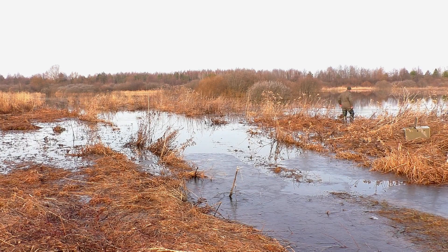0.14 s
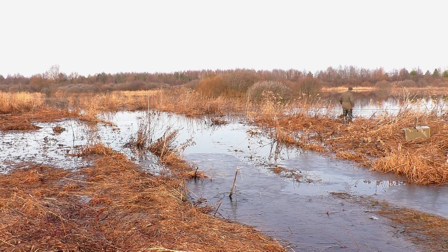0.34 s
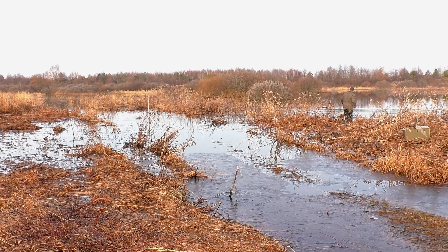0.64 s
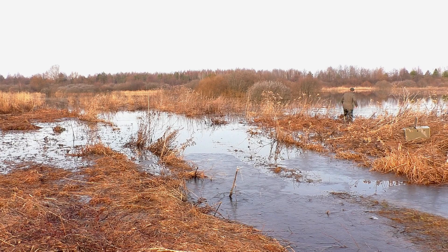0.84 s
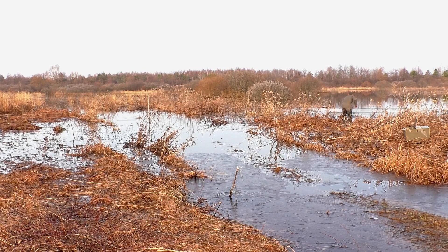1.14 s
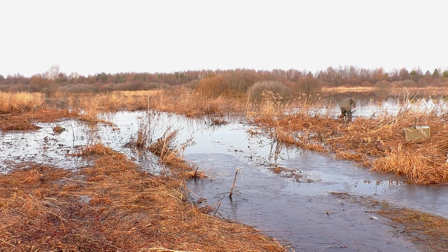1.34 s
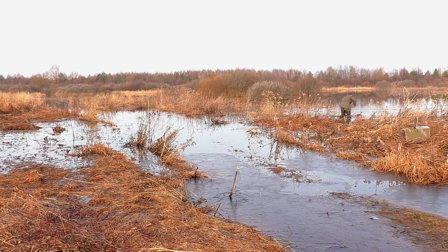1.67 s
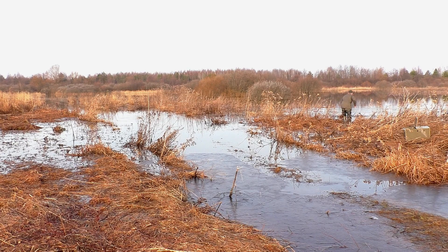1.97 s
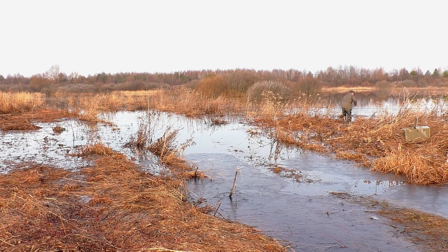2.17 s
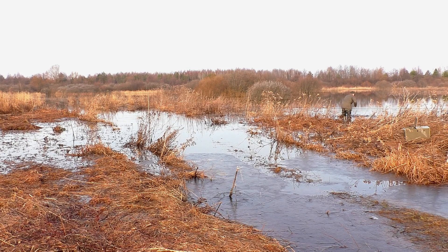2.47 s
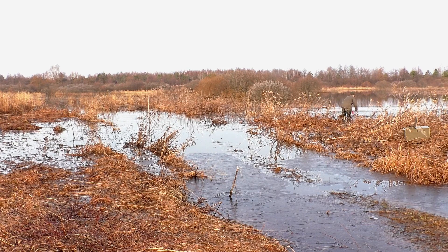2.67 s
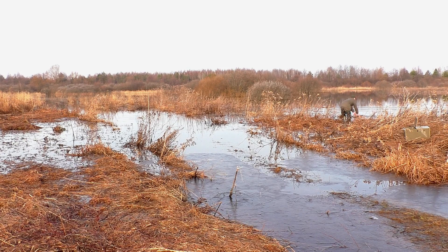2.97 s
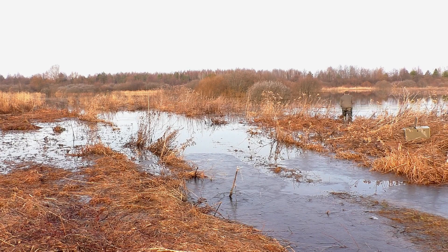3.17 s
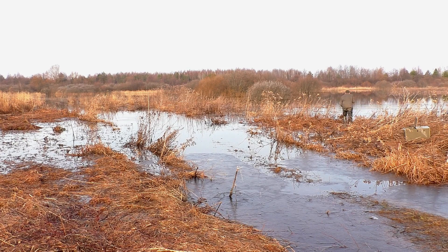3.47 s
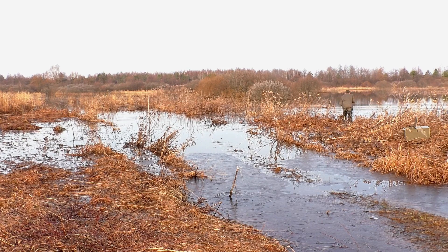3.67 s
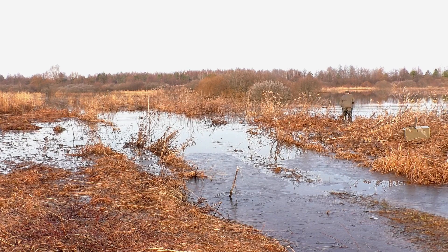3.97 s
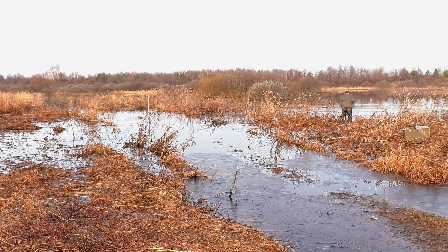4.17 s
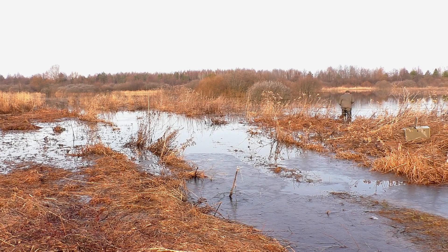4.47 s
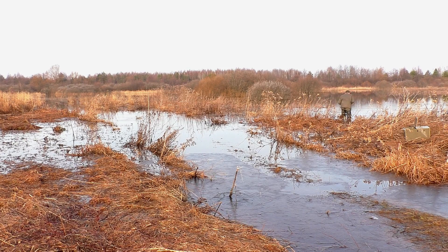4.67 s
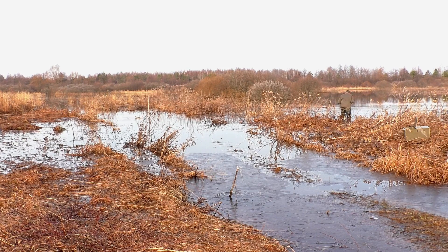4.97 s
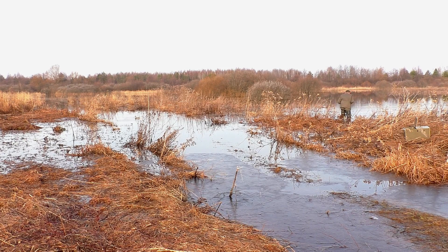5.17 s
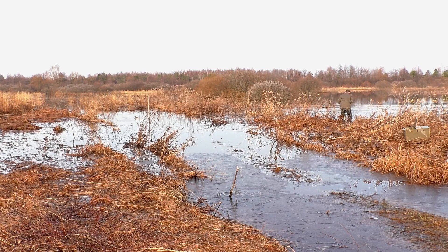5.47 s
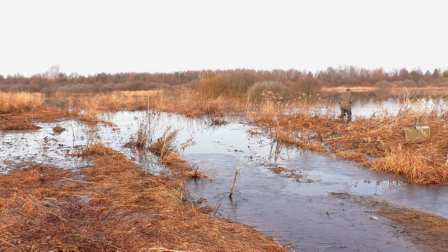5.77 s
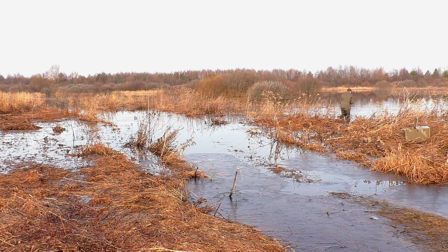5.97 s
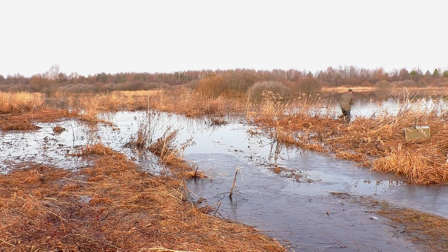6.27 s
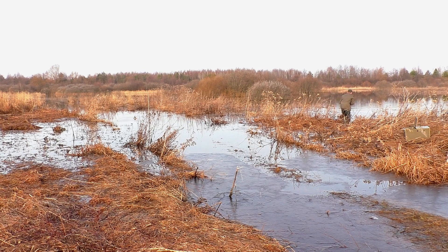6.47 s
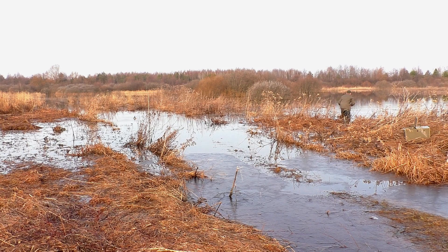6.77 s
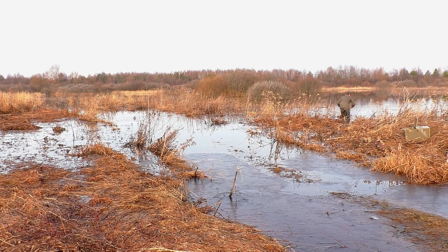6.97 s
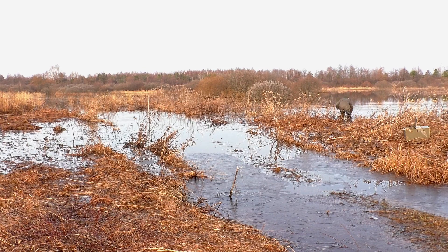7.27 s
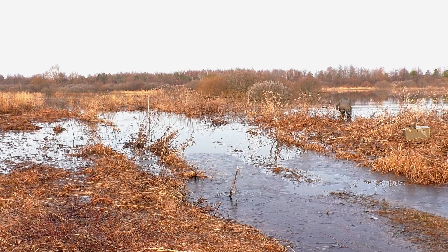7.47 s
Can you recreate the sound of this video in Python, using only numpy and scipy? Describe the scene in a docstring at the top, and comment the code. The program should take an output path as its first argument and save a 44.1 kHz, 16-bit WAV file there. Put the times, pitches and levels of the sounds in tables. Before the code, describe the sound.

Someone wades through wet grass, water plopping and stems cracking, while a duck quacks roughly every seven tenths of a second. The first five quacks are near, buzzy and forceful; the remaining six drop sharply in level and echo more. A quick run of tiny clucks comes near five seconds. Small birds twitter faintly later, with distant low hoots. Quiet open marsh, heard in wide stereo over faint rumble and hiss.

```python
"""The air rumbles faintly while someone wades through wet grass on a flooded marsh; something hoots far off.
A hen duck quacks eleven times: five hard, rasping calls, then, turned away, six softer, clearer ones.
Each quack is a train of uneven syrinx slaps and hissing puffs through the resonances of windpipe and bill.
Steps are noise grains, gliding bubbles and snaps; hoots and small birds' whistles are gliding sines.
The reeds and the distant trees, a decaying coloured noise, give quacks, steps and song a short, dull echo."""
import sys
import numpy as np
from scipy import signal
from scipy.fft import rfft, irfft, next_fast_len
from scipy.io import wavfile
from scipy.ndimage import map_coordinates

SR = 44100
rng = np.random.default_rng(int(sys.argv[2]) if len(sys.argv) > 2 else 0)


def int16_out(signal):
    """Quantize to a 16-bit WAV file."""
    q = np.round(np.clip(np.atleast_2d(signal).T, -1, 1) * 32767)
    wavfile.write(sys.argv[1], SR, q.astype(np.int16))


N = 335601  # length [samples]


def amp(db):
    """Decibels to gain."""
    return 10 ** (np.asarray(db) / 20)


def unit(x):
    """Scaled to rms 1."""
    return x / np.sqrt(np.mean(x ** 2) + 1e-20)


def along(points, hz):
    """(frequency [Hz], value) points read on a log frequency axis."""
    f, v = np.transpose(points)
    return np.interp(np.log(hz + 1), np.log(f + 1), v)


def span(start, length):
    """Sample times of one event."""
    return start + np.arange(round(length * SR)) / SR


def fade(t, rise, fall):
    """A gate with straight ramps at both ends."""
    return np.clip((t - t[0]) / rise, 0, 1) * np.clip((t[-1] - t) / fall, 0, 1)


def add(track, s, x):
    """Mix x into the track at s seconds."""
    i = max(round(s * SR), 0)
    track[i:i + len(x)] += x[:max(len(track) - i, 0)]


def wobble(t, rate):
    """A smooth random curve, rate knots a second."""
    u = (t - t[0]) * rate
    return map_coordinates(rng.standard_normal(int(u[-1]) + 4), [u])


def filtered(x, response):
    """x times a response of frequency."""
    n = x.shape[-1]
    m = next_fast_len(n + 8192)
    return irfft(rfft(x, m) * response(np.fft.rfftfreq(m, 1 / SR)), m)[..., :n]


def resonate(x, points, size=2048):
    """x through a causal body with the given spectrum."""
    # folding the cepstrum gives the minimum-phase response
    cepstrum = irfft(np.log(amp(along(points, np.fft.rfftfreq(size, 1 / SR)))))
    cepstrum[1:size // 2] *= 2
    cepstrum[size // 2 + 1:] = 0
    body = irfft(np.exp(rfft(cepstrum)))
    return signal.fftconvolve(x, body)[:len(x)]


def pulses(at, sizes, length):
    """Clicks at fractional sample positions, each a windowed sinc."""
    taps = np.floor(at)[:, None].astype(int) + np.arange(-7, 9)
    d = taps - at[:, None]
    shape = np.sinc(d) * np.cos(np.pi * d / 16) ** 2
    return np.bincount(np.clip(taps, 0, length - 1).ravel(), (sizes[:, None] * shape).ravel(), length)


def steady(x, size=1201):
    """x with its slow loudness evened out to rms 1."""
    window = np.hanning(size)
    energy = signal.fftconvolve(x ** 2, window, 'same')
    power = energy / signal.fftconvolve(np.ones(len(x)), window, 'same')
    return x / np.sqrt(np.abs(power) + 1e-20)


def band(x, lo_hz, hi_hz, order=40):
    """The part of x between two edges, steeper with a higher order."""
    return filtered(x, lambda hz: 1 / (1 + (hz / hi_hz) ** order) - 1 / (1 + (hz / lo_hz) ** order))


def pan(x, side_db):
    """Mono to stereo, side_db louder on the left."""
    return x * amp(np.array([[side_db], [-side_db]]) / 2)


def blip(hz, glide, life):
    """A short gliding ring with a soft start, its envelope peaking at 1."""
    u = np.arange(SR // 10) / SR / life
    phase = np.cumsum(hz * (1 + glide * (1 - np.exp(-u / 2)))) / SR
    return u * np.exp(1 - u) * np.sin(2 * np.pi * phase)


# how alike left and right are in the open air: (frequency [Hz], correlation [-1 to 1])
LIKENESS = [(60, 0.84), (150, 0.88), (380, 0.77), (950, 0.66), (2380, 0.16), (5980, 0.66), (15000, 0.56)]


def rush(spectrum):
    """Stereo noise of rms 1; the mid-side balance sets how alike the two sides are."""
    def turn(hz):
        """Angle between mid and side [rad]."""
        return np.arccos(np.clip(along(LIKENESS, hz), -1, 1)) / 2

    def response(hz):
        """Gains of mid and side."""
        return amp(along(spectrum, hz)) * [np.cos(turn(hz)), np.sin(turn(hz))]

    mid, side = filtered(rng.standard_normal((2, N)), response)
    return unit(np.array([mid + side, mid - side]))


# colour of the low rumble: (frequency [Hz], relative level [dB])
RUMBLE_COLOUR = [(12, -59), (20, -41), (39, -6), (70, -0.5), (170, -2), (215, -3.5), (260, -9),
                 (333, -11.5), (392, -11), (428, -16), (483, -10), (594, -28.5), (700, -23), (910, -56),
                 (1540, -120)]
# colour of the faint hiss: (frequency [Hz], relative level [dB])
AIR_COLOUR = [(350, -62), (600, -9), (688, -2.5), (789, -13.5), (880, 0), (1360, 0.5), (1890, 3.5),
              (4080, -11.5), (4870, -14.5), (5980, -20), (9520, -15.5), (10500, -12), (15800, -14)]
RUMBLE_DB, AIR_DB = -54.5, -61  # mean levels


def open_air():
    """A low, wavering rumble under a faint even hiss, both coloured noise."""
    t = np.arange(N) / SR
    rumble = amp(RUMBLE_DB + 0.73 * wobble(t, 9)) * rush(RUMBLE_COLOUR)
    return rumble + amp(AIR_DB + 0.13 * wobble(t, 3.33)) * rush(AIR_COLOUR)


# a boot stirs the water, both levels at the loudest moment, before the clumping:
# (loudest time [s], swell time constant [s], ebb time constant [s], slosh level [dB], grass crackle level [dB])
STRIDES = [(0.099, 0.23, 0.083, -54, -68), (1.52, 0.54, 0.16, -54.5, -69), (1.7, 0.11, 0.11, -43, -52),
           (2.02, 0.1, 0.2, -47, -60.5), (2.23, 0.24, 0.21, -47.5, -63.5),
           (3.17, 0.23, 0.037, -51.5, -66.5), (3.862, 0.013, 0.023, -56, -89)]
LAPPING_DB = -79.5  # water between the strides, before the clumping


def stirring(t):
    """Strength of slosh and of crackle: each stride swells and ebbs."""
    slosh, crackle = np.full(N, amp(LAPPING_DB)), np.zeros(N)
    for s, swell, ebb, slosh_db, crackle_db in STRIDES:
        push = np.exp(-np.maximum((s - t) / swell, (t - s) / ebb))
        slosh = np.maximum(slosh, amp(slosh_db) * push)
        crackle = np.maximum(crackle, amp(crackle_db) * push)
    return slosh, crackle


def grains(rate, spread_db):
    """Random tiny impacts of uneven size, rms 1."""
    hit = rng.random(N) < rate / SR
    return unit(hit * rng.choice([-1, 1], N) * amp(spread_db * np.clip(rng.standard_normal(N), -2, 2)))


def bubbles(rate, hz, spread):
    """Small bubbles of random pitch and size, each a ring gliding up; rms 1."""
    track = np.zeros(N)
    count = int(rate * N / SR)
    times = rng.random(count) * N / SR
    for s, (pitch, size) in zip(times, rng.standard_normal((count, 2)).clip(-2, 2)):
        add(track, s, amp(3.6 * size) * blip(hz * np.exp(spread * pitch), glide=0.16, life=0.0021))
    return unit(track)


# colour of the stirred water: (frequency [Hz], relative level [dB])
SLOSH_COLOUR = [(240, -3), (400, -3.5), (826, -19.5), (946, -3), (1170, -6), (1710, -13), (3250, -8),
                (6000, -23), (7800, -31), (13200, -120)]
# colour of crushed wet stems: (frequency [Hz], relative level [dB])
CRACKLE_COLOUR = [(2500, -39), (4500, 13.5), (9000, 21), (15000, 13)]
# water gulping round the boots: (time [s], level before the 2 dB plop trim and pan [dB], starting pitch [Hz])
PLOPS = [(0.067, -40, 1210), (0.094, -44, 1030), (1.259, -39.5, 2090), (1.306, -36, 1320),
         (1.329, -42.5, 2310), (2.029, -37, 1090), (2.116, -37, 1150), (2.186, -43, 1230),
         (3.129, -51, 1810), (3.161, -43, 1070), (3.178, -44, 2230), (3.852, -44, 1280),
         (3.869, -42.5, 1820), (3.885, -53, 2110)]
# low knocks, boots thudding into mud and the low part of stem snaps:
# (time [s], envelope peak before pan [dB], starting pitch [Hz])
KNOCKS = [(1.672, -33.5, 270), (1.69, -39, 198), (2.028, -54, 630), (2.187, -40.5, 840)]
# stems snapping underfoot: (time [s], peak level before pan [dB])
SNAPS = [(0.04, -41.5), (0.766, -47.5), (1.3293, -29), (1.447, -42), (1.542, -34.5), (1.6234, -37),
         (1.651, -22), (1.7857, -23), (2.028, -38), (2.054, -33.5), (3.1807, -48), (6.4697, -55)]
PLOP_TRIM_DB = -2


def wading():
    """Boots stir the water, trap bubbles and crush wet stems: grains, rings and noise bursts."""
    t = np.arange(N) / SR
    slosh, crackle = stirring(t)
    clumps = amp(4.1 * wobble(t, 45))
    splash = unit(resonate(grains(3000, spread_db=4), SLOSH_COLOUR))
    water = unit(splash + .7 * bubbles(rate=200, hz=1300, spread=.3))
    stems = unit(resonate(grains(2200, spread_db=6), CRACKLE_COLOUR))
    track = slosh * clumps * water + crackle * clumps * stems
    for s, db, hz in PLOPS:
        add(track, s, amp(db + PLOP_TRIM_DB) * blip(hz, glide=.12, life=.0016))
    for s, db, hz in KNOCKS:
        add(track, s, amp(db) * blip(hz, glide=-0.025, life=0.0013))
    age = np.arange(SR // 30) / SR
    # a quick crack and a fainter, longer tail
    decay = amp(-60 * age / .005) + .1 * amp(-60 * age / .025)
    for s, db in SNAPS:
        snap = resonate(rng.standard_normal(len(age)) * decay, CRACKLE_COLOUR)
        add(track, s, amp(db) * snap / np.abs(snap).max())
    return track


# far hoots: (time [s], length [s], mean pitch [Hz], peak level before pan [dB])
HOOTS = [(0.08, .14, 470, -49.5), (0.68, 0.19, 474, -53.5), (2.55, 0.12, 487, -52.5),
         (3.14, 0.13, 474, -53.5), (4.69, .16, 484, -59), (6.24, 0.22, 488, -57.5),
         (6.87, 0.23, 464, -60.5)]


def hoots():
    """Far calls: single sines that sag in pitch, with soft ends."""
    track = np.zeros(N)
    for s, length, hz, db in HOOTS:
        t = np.arange(int(length * SR)) / SR
        phase = np.cumsum(hz * (1 - 0.1 * (t / length - .5) + 0.0015 * wobble(t, 28))) / SR
        add(track, s, amp(db) * np.sin(2 * np.pi * phase) * fade(t, 0.036, 0.077))
    return track


# the voice cracks, the pitch jumps and the beats even out:
# (middle time [s], length [s], pitch jump [share of pitch], evenness [0-1], level change [dB])
CRACKS = [(1.677, .118, .036, 0.07, 0.5), (1.71, .064, .045, 0.95, -4), (2.888, .022, -.11, 0.3, -2.5),
          (2.919, .038, 0.091, .5, 1.5), (3.015, 0.0322, 0.033, 0.2, 0), (3.054, .044, .1, 0.2, 1.5)]
CRACK_EDGE = 4.2  # how squarely a crack sets in and lets go


def cracks(t):
    """Pitch jump, evenness and level change where the voice cracks."""
    return sum(np.outer(change, np.exp(-np.abs(2 * (t - s) / length) ** CRACK_EDGE))
               for s, length, *change in CRACKS)


def grass(x, level_db, t60):
    """Stems close by scatter the sound, smearing and colouring it a little."""
    age = np.arange(SR // 20) / SR
    tail = rng.standard_normal(len(age)) * amp(-60 * age / t60)
    response = (age == 0) + amp(level_db) * tail / np.linalg.norm(tail)
    return signal.fftconvolve(x, response / np.linalg.norm(response))


# windpipe and bill, heard from the front: (frequency [Hz], relative level [dB])
THROAT_FRONT = [(180, -25), (700, -24.5), (950, -17.5), (1230, -7), (1430, -11.5), (1750, 6), (1960, 3.5),
                (2150, 5.5), (2580, -21), (3100, -14.5), (3500, -27.5), (4150, -27.5), (4750, -27.5),
                (6500, -27), (10000, -37.5), (16000, -58)]
# windpipe and bill, heard from behind: (frequency [Hz], relative level [dB])
THROAT_BEHIND = [(180, -29), (700, -4), (950, 7), (1250, 7.5), (1480, -7.5), (1730, -8.5), (2020, 3),
                 (2350, -10), (2700, -8), (3020, -21), (3300, -13), (3850, -25.5), (4700, -27), (7000, -34),
                 (16000, -43)]
# change of each band while the bill is still shut [dB]
SHUT_MAIN_DB, SHUT_THROAT_DB, SHUT_EDGE_DB, SHUT_FUNDAMENTAL_DB = -20, -5, -15, -9
BODY_AIR, EDGE_AIR = .25, 1  # share of hissing air in the resonances and in the bright edge
SHUT_SCALE, RESONANCE_RISE_S = 0.826, 0.015  # resonances behind a shut bill, and how fast they rise
OPENING_CURVE = 1.4  # the bill starts to open slowly, then quickly
ATTACK_DB, ATTACK_S = -7, 0.0097  # the first few slaps are weak
EDGE_PUSH, FUNDAMENTAL_PUSH = 1.6, 0.27  # their dB per dB of growing push
WANDER, WANDER_PER_S = 0.00612, 28.07  # the held pitch is never quite still: share of pitch, knots/s
JITTER, EARLY = 0.033, 0.11  # scatter at full roughness, lead of a fully weak slap [cycles]
SIZZLE_DB, SLACK_DB = 1, -5.5  # gain of the edge's top at full pressure, and its change without
SIZZLE_RISE_S, SIZZLE_FALL_S = 0.064, 0.016
WEAK_DB = -6.5  # the weak slap of a fully split voice, relative to the strong one
EVEN_EDGE_DB = 3  # an even voice keeps its bright edge
# reference for an even voice's low tones; what a full split and turning away take from it
FUNDAMENTAL_DB, SPLIT_COST_DB, AWAY_COST_DB = -42, -3, -3
ONSET_ROUGH, SETTLE_S = 0.28, 0.054  # extra rasp until the syrinx settles
PINCH_DB, PINCH_S = -21, 0.0047  # the resonances are choked at the very end


def quack(start, length, held_hz, scoop, scoop_s, open_s, push, main_db, throat_db, throat_drift, edge_db,
          split_from, split_to, rough, scale, away, top_db):
    """The syrinx slaps once a cycle; when the voice splits, every second slap comes early and weak."""
    t = span(start, length)
    age, left = t - t[0], t[-1] - t
    away = np.clip(away, 0, 1)
    jump, even, crack_db = cracks(t)
    # the pitch scoops up from below and holds
    rise = 1 - scoop * np.clip(1 - age / scoop_s, 0, 1) ** 2
    hz = held_hz * rise * (1 + jump + WANDER * wobble(t, WANDER_PER_S))
    split = np.clip((split_from + (split_to - split_from) * age / length) * (1 - even), 0, 1)
    rough = np.clip((rough + ONSET_ROUGH * np.exp(-age / SETTLE_S)) * (1 - 0.64 * even), 0, 1)

    # the bill opens, the push grows, then the call is choked
    shut = np.exp(-(age / open_s) ** OPENING_CURVE)
    attack_db = ATTACK_DB * np.exp(-age / ATTACK_S)
    voicing_db = crack_db + attack_db + PINCH_DB * np.exp(-left / PINCH_S)
    push_db = -push * left
    fundamental_db = FUNDAMENTAL_DB + SPLIT_COST_DB * split + AWAY_COST_DB * away
    fundamental_db = fundamental_db + SHUT_FUNDAMENTAL_DB * shut + FUNDAMENTAL_PUSH * push_db
    main_db = main_db + SHUT_MAIN_DB * shut + push_db + voicing_db + 3.8 * rough * wobble(t, 42)
    throat_db = throat_db + SHUT_THROAT_DB * shut - throat_drift * left + voicing_db
    edge_db = edge_db + SHUT_EDGE_DB * shut + EDGE_PUSH * push_db + voicing_db + EVEN_EDGE_DB * even

    # the pitch flicks upward as the call is pinched off
    flick = 0.36 * np.exp((t - t[-1]) / 0.00497)
    hz = hz * (1 + flick + 0.016 * rough * wobble(t, 86.6))
    phase = np.cumsum(hz) / SR
    beats = np.arange(1, int(phase[-1]))
    at = np.interp(beats, phase, np.arange(len(t)))
    i = at.astype(int)
    weak = beats % 2 * split[i]
    jitter, shimmer = rng.standard_normal((len(beats), 2)).T
    at = at + (JITTER * rough[i] * jitter - EARLY * weak) * SR / hz[i]
    slaps = unit(pulses(at, amp(WEAK_DB * weak + 6.8 * rough[i] * shimmer), len(t)))
    # air hisses in a fading puff once a cycle
    puffs = rough * unit(rng.standard_normal(len(t)) * np.exp(-3 * (phase % 1)))

    grid = np.geomspace(100, 16000, 200)
    front, behind = along(THROAT_FRONT, grid / scale), along(THROAT_BEHIND, grid / scale)
    colour = (1 - away) * front + away * behind + top_db * (grid > 4000)
    throat = np.column_stack([grid, colour])
    # the resonances start low and rise as the bill opens
    breath = slaps + BODY_AIR * puffs
    closed = np.exp(-age / RESONANCE_RISE_S)
    voice = (1 - closed) * resonate(breath, throat) + closed * resonate(breath, throat * [SHUT_SCALE, 1])
    edge = resonate(slaps + EDGE_AIR * puffs, throat)
    # a reflection inside the stretching windpipe ripples the upper resonances
    delay = .00049 * (1 + .08 * wobble(t, 14))
    edge = edge - .35 * np.interp(t - delay, t, edge)

    body = amp(throat_db) * steady(band(voice, 474, 1527))
    body = body + amp(main_db) * steady(band(voice, 1530, 2686))
    edge = amp(edge_db + 2.9 * rough * wobble(t, 79.5)) * steady(band(edge, 2590, 14000))
    # the topmost sizzle needs full pressure: it comes late and goes early
    slack = np.exp(-age / SIZZLE_RISE_S) + np.exp(-left / SIZZLE_FALL_S)
    edge = edge + (amp(SIZZLE_DB + SLACK_DB * slack) - 1) * band(edge, 2800, 16000, order=8)
    gate = fade(t, .003, .006)
    call = grass(body * gate, level_db=-14, t60=.04) + grass(edge * gate, level_db=-9, t60=.025)
    # uneven beats add tones at half and one and a half times the pitch
    halves = 0.31 * np.sin(np.pi * phase) + 0.3 * np.sin(3 * np.pi * phase)
    low_tones = 1.29 * np.sin(2 * np.pi * phase) + split * halves
    add(call, 0, amp(fundamental_db) * low_tones * fade(t, 0.009, 0.0043))
    return call


# one row for each quack, band levels as at the end, bill open, before cracks, pinch, scatter and pan:
# (time [s], length [s], held pitch [Hz], scoop from below [share of pitch], scoop time [s],
#  bill opening time [s], push [dB/s], main resonance level [dB], throat resonance level [dB],
#  throat drift [dB/s], bright edge level [dB], split into strong and weak beats at the start [0-1],
#  split at the end [0-1], settled roughness [0-1], resonance scale [ratio], turned away [0-1],
#  level change of everything above 4 kHz [dB], level sent to the echo [dB])
QUACKS = [ (0.242, .252, 357.3, 0.36, 0.19, .042, 11, -35, -42.5, 24, -53, 0.64, .8, 0.25, 1.007, 0.24, -4.5, -19.5),
          (0.953, 0.25, 356, 0.33, .185, 0.04, 29.5, -31, -38, 16, -47, 1, 0.77, 0.29, 0.99, 0.06, -6.5, -20.5),
          (1.574, 0.24, 352.6, 0.36, 0.059, 0.029, 0, -28, -35.5, 16, -40.5, 0.65, 1, 0.28, 1.011, 0.04, -3.5, -25),
          (2.217, 0.27, 352, 0.2, .110, 0.039, 17, -26, -37.5, -2.5, -33.5, 0.8, 0.94, 0.29, 1.01, 0.02, -3.5, -24.5),
          (2.830, .242, 331.7, 0.46, .075, 0.037, 6, -29.5, -41, -24, -37.5, 0.44, .15, 0.46, 1.073, 0.12, 0, -24),
          (3.414, 0.24, 411.9, 0.3, 0.17, 0.032, 13, -44.5, -50, -16, -50.5, 0.73, 0.32, 0.33, 1.103, 0.6, -5, -13),
          (4.211, .251, 406.2, .36, 0.14, 0.026, 32, -48, -54, -27, -52, 0.87, .3, 0.3, 1.07, 0.9, 1, -10.5),
          (4.978, .238, 397.4, .37, .115, 0.025, 16, -43, -51, -2, -63.5, 1, 0.53, 0.3, 1.01, 0.53, 2, -16),
          (5.736, 0.25, 424.2, 0.27, 0.14, 0.047, 28, -47.5, -55, -20, -55.5, 0.05, 0.4, 0.33, .99, 0.83, 1, -12),
          (6.584, 0.25, 403.4, 0.24, 0.18, 0.039, 23, -47, -51.5, 5, -60, 0.28, 0, 0.16, 0.956, 0.76, -1.5, -15),
          (7.391, 0.23, 423, 0.26, 0.19, 0.038, 21, -45.5, -49.5, -15, -56, 0.44, 0.03, 0.34, 1.045, 1, 3.5, -16)]
# a quick run of soft clucks: (time [s], envelope peak before pan [dB])
CLUCKS = [(4.852, -44.5), (4.912, -44), (4.972, -42), (5.029, -50), (5.084, -38), (5.134, -40),
          (5.228, -47), (5.272, -45), (5.355, -49)]


def duck():
    """The quacks and clucks: what comes straight, and the quacks that go out over the marsh."""
    direct, outward = np.zeros((2, N))
    for s, *shape, echo_db in QUACKS:
        call = quack(s, *shape)
        add(direct, s, call)
        add(outward, s, amp(echo_db) * call)
    for s, db in CLUCKS:
        add(direct, s, amp(db) * blip(1530, glide=-0.15, life=0.0012))
    return direct, outward


# small birds, one row for each whistle glide; those near 9 kHz are strong overtones of a lower whistle;
# level before swell, flutter and pan:
# (time [s], length [s], first pitch [Hz], last pitch [Hz], arch at the middle [Hz], level [dB])
GLIDES = [(0.82, 0.11, 5560, 4460, 11, -69.5), (3.773, 0.034, 5200, 5020, 80, -57.5),
          (3.83, 0.12, 5000, 5030, 1, -68), (3.915, 0.067, 5010, 5000, 55, -65),
          (4.018, 0.036, 4850, 4740, -70, -64), (4.055, 0.033, 4950, 4680, 60, -62),
          (4.199, 0.077, 5200, 5200, -520, -62.5), (5.022, 0.022, 5500, 5930, 10, -54.5),
          (5.082, 0.047, 4060, 3500, 4, -63), (5.268, 0.069, 5120, 4740, 246, -64),
          (5.275, 0.058, 3650, 3350, 554, -59.5), (5.331, 0.072, 3220, 3530, -230, -60.5),
          (5.51, 0.055, 3700, 3400, 450, -67), (5.56, .06, 3220, 3200, -60, -61),
          (5.622, 0.044, 3440, 3400, 504, -66), (5.683, 0.047, 3230, 3190, -2, -63),
          (5.88, 0.14, 5600, 4360, 2, -70), (6.85, .08, 5400, 5520, 0, -72),
          (6.98, 0.18, 4350, 4280, 481, -66.5), (7.025, 0.068, 9440, 9400, 228, -59.5),
          (7.09, 0.063, 9060, 9330, 144, -60), (7.241, .06, 5400, 5620, -50, -64.5),
          (7.301, .09, 3600, 3300, 100, -66), (7.318, 0.044, 5470, 5520, -35, -63),
          (7.437, 0.037, 5650, 5500, 0, -61)]
OVERTONE_DB = -17  # the octave above each glide, relative to it
GLIDE_SWELL_DB = 1.5  # a glide loses this at its middle and twice this at its ends


def birds():
    """Thin whistles built from arched glides that flutter more where they move fast."""
    track = np.zeros(N)
    for s, length, first_hz, last_hz, arch_hz, db in GLIDES:
        t = span(s, length)
        u = (t - s) / length
        arch = 1 - (2 * u - 1) ** 2
        hz = first_hz + (last_hz - first_hz) * u + arch_hz * arch
        gliding = np.clip(np.abs(np.gradient(hz, t)) / 20000, 0, 1)
        flutter = .02 * gliding * np.sin(2 * np.pi * 55 * t) + .006 * wobble(t, 90)
        phase = np.cumsum(hz * (1 + flutter)) / SR
        tone = np.sin(2 * np.pi * phase) + amp(OVERTONE_DB) * np.sin(2 * np.pi * 2 * phase)
        level_db = db - GLIDE_SWELL_DB * (2 - arch) + 2.8 * wobble(t, 94)
        add(track, s, amp(level_db) * tone * fade(t, 0.0038, 0.0061))
    return track


# how long the marsh rings: (frequency [Hz], time to fall by 60 dB [s])
ECHO_DECAY = [(200, 0.47), (1900, 0.57), (4000, 0.28), (10000, 0.89)]
# colour of the echo as it starts: (frequency [Hz], relative level [dB])
ECHO_COLOUR = [(300, -16), (700, -17), (1200, -8), (1700, -1), (2400, 0), (3200, -7), (10000, -17)]


def echo(x):
    """Reeds and trees scatter sound back; each frequency dies at its own speed."""
    hz, t, z = signal.stft(rng.standard_normal((3, SR)), SR, nperseg=256)
    shape = amp(along(ECHO_COLOUR, hz)[:, None] - 60 * t / along(ECHO_DECAY, hz)[:, None])
    common, *own = signal.istft(z * shape, SR, nperseg=256)[1]
    # a shared part and a stronger separate part for each side
    tail = common + 1.46 * np.array(own)
    tail = tail * np.clip(np.arange(tail.shape[1]) / SR / 0.025, 0, 1)
    return signal.fftconvolve(x[None], tail / np.linalg.norm(tail[0]), axes=1)[:, :N]


# where the duck sits, negative to the right: (frequency [Hz], left minus right level [dB])
DUCK_SIDE = [(150, -2.5), (380, -4), (950, -4), (2400, -3), (6000, -2.5), (15000, -1)]


def scene():
    """The duck sits a little to the right, with the marsh all round."""
    (calls, outward), steps, song = duck(), wading(), birds()
    near = filtered(calls, lambda hz: amp(np.outer([.5, -.5], along(DUCK_SIDE, hz))))
    direct = near + pan(steps, side_db=-2.5) + pan(song, side_db=7.0) + pan(hoots(), side_db=-4.0)
    return direct + echo(outward + amp(-14.5) * steps + amp(-5) * song) + open_air()


TOP_HZ = 15850


def record(dry):
    """A sharp band limit removes everything from TOP_HZ up."""
    return filtered(dry, lambda hz: hz < TOP_HZ)


dry = scene()
out = record(dry)
int16_out(out)
```